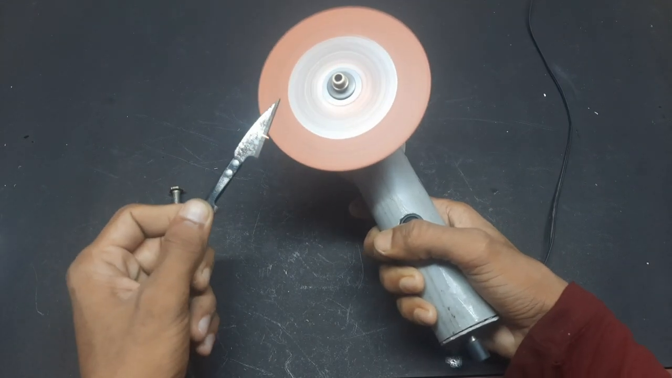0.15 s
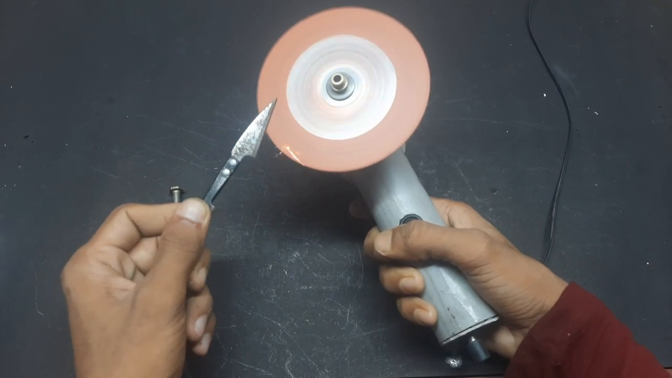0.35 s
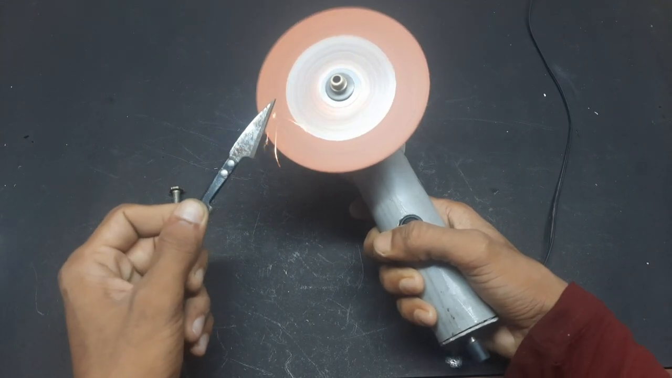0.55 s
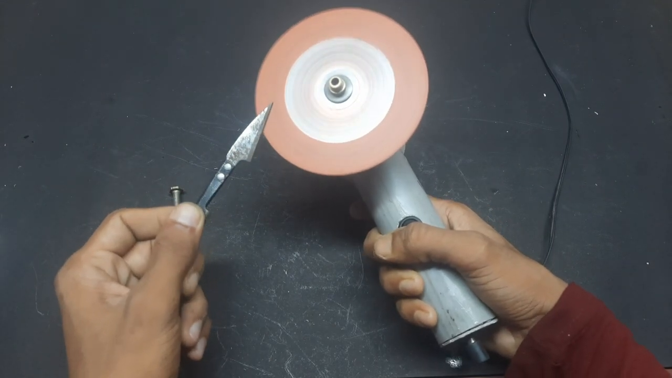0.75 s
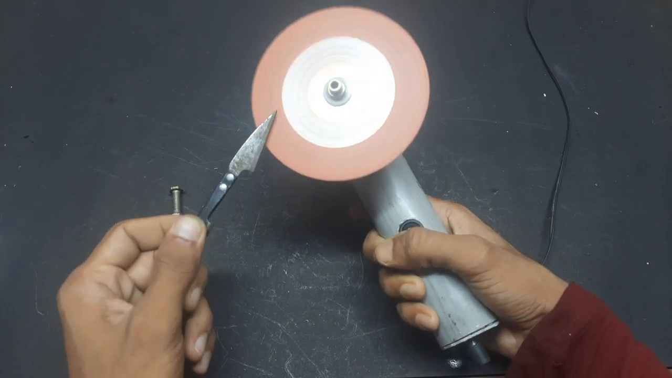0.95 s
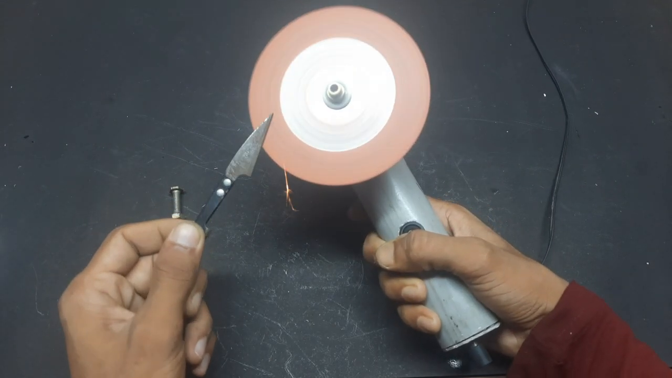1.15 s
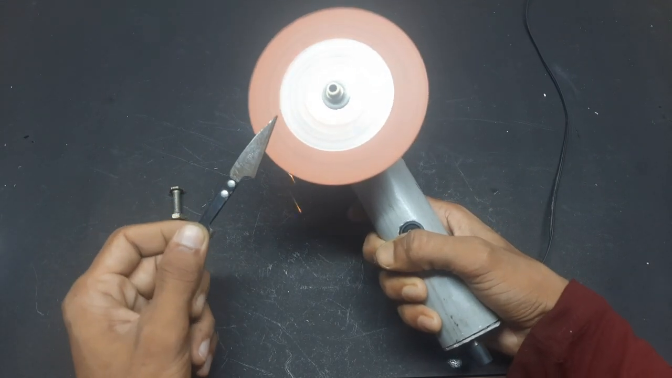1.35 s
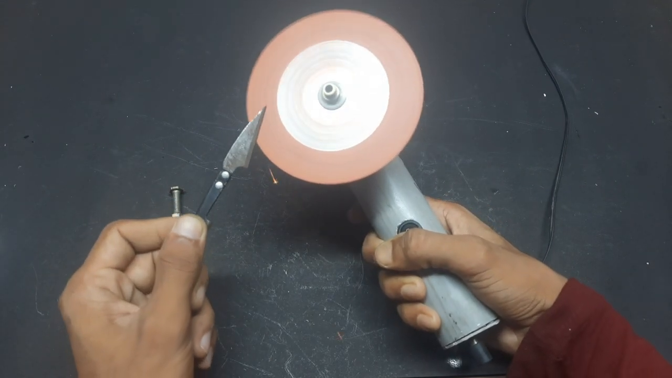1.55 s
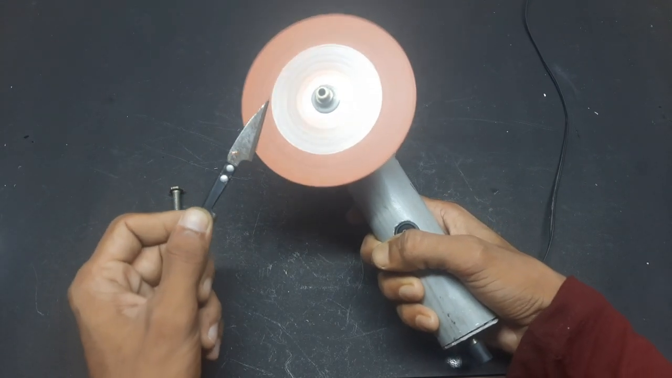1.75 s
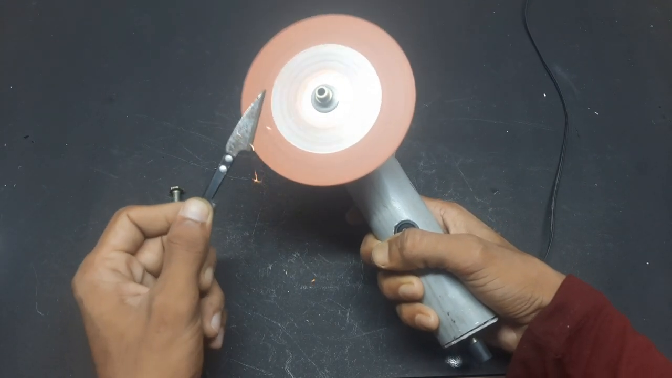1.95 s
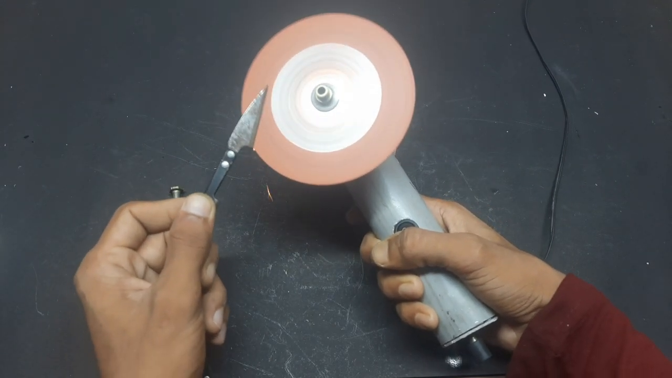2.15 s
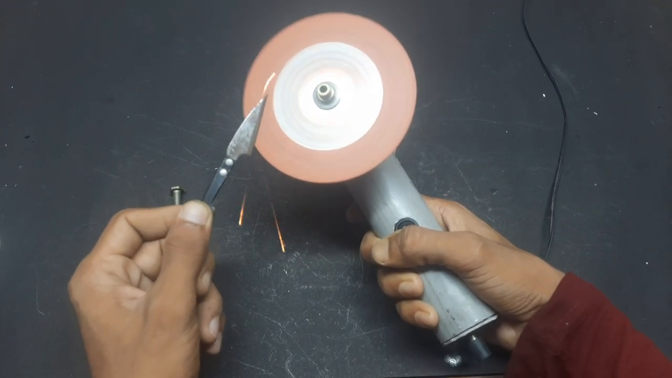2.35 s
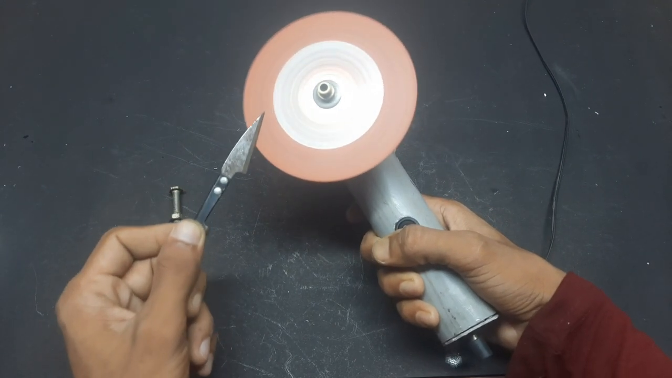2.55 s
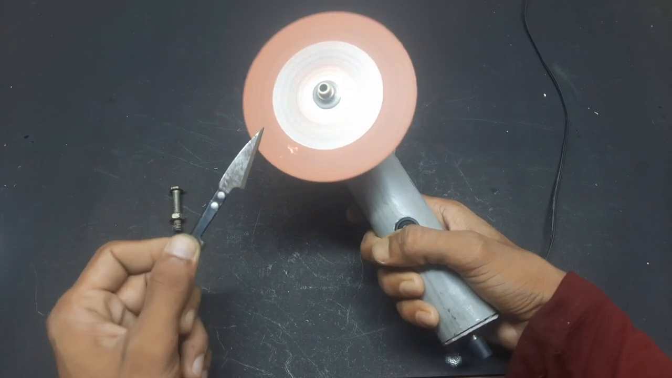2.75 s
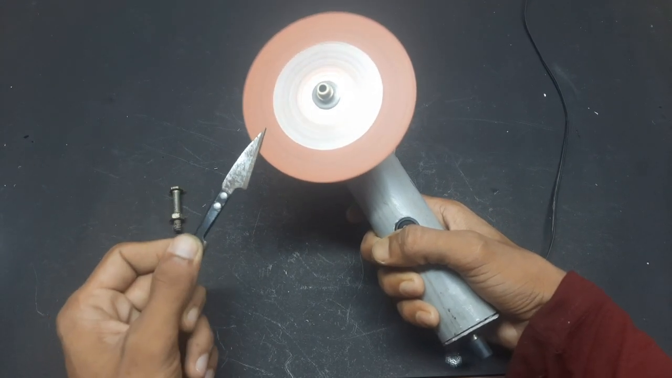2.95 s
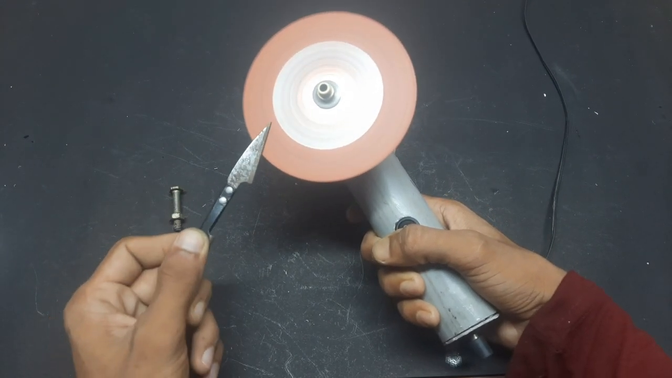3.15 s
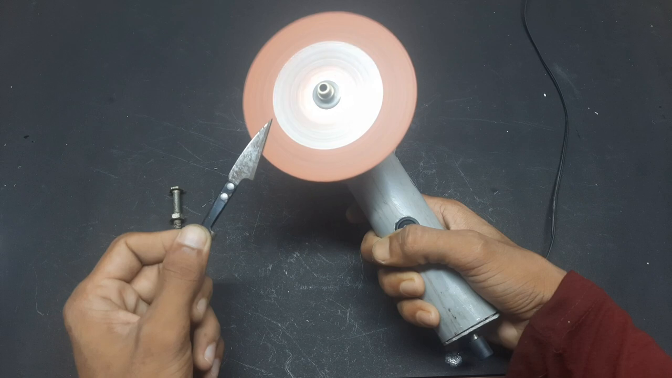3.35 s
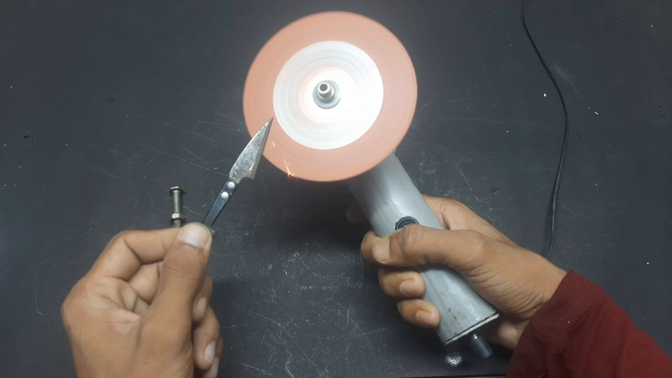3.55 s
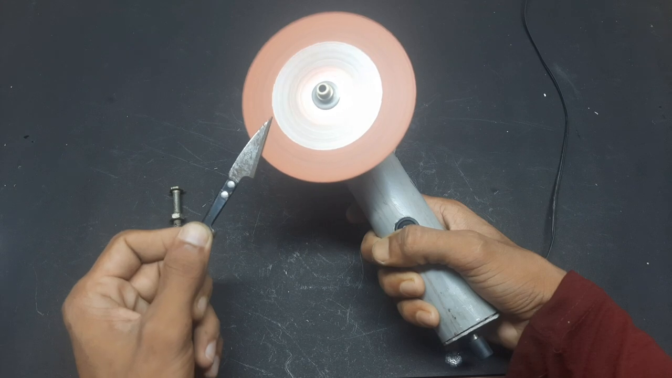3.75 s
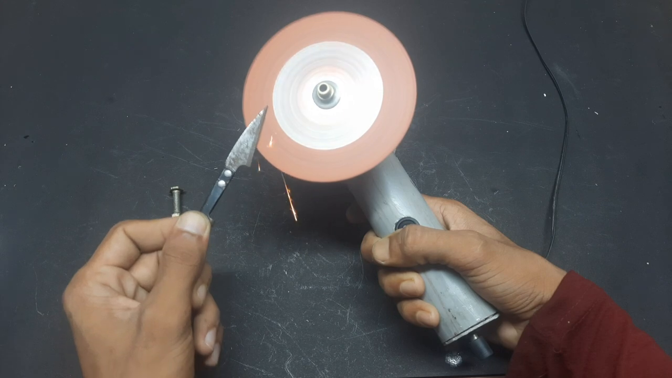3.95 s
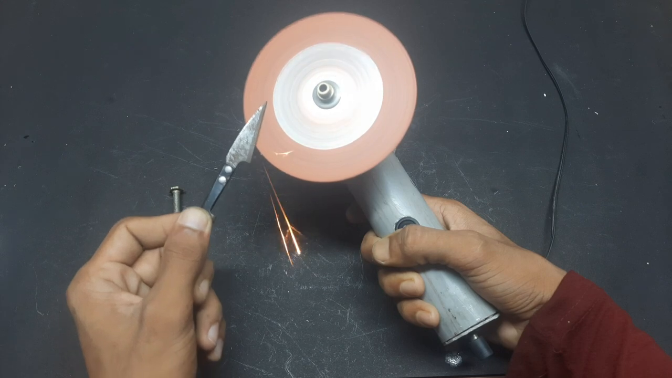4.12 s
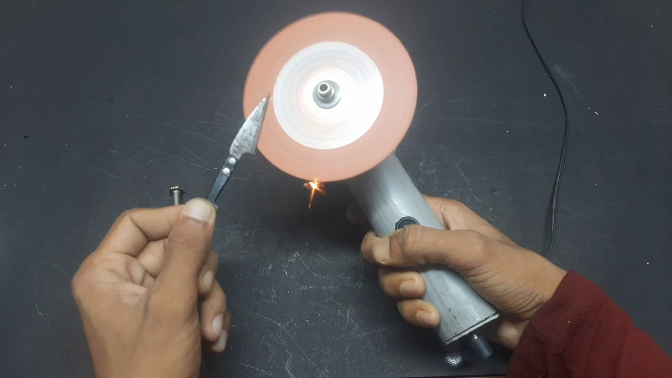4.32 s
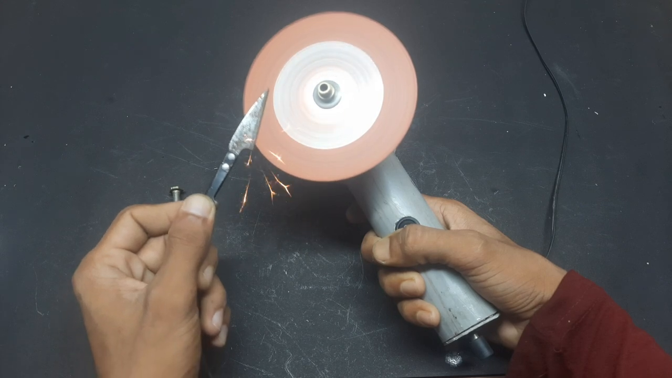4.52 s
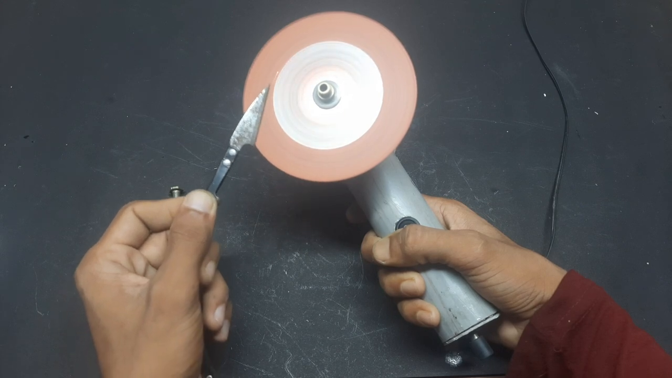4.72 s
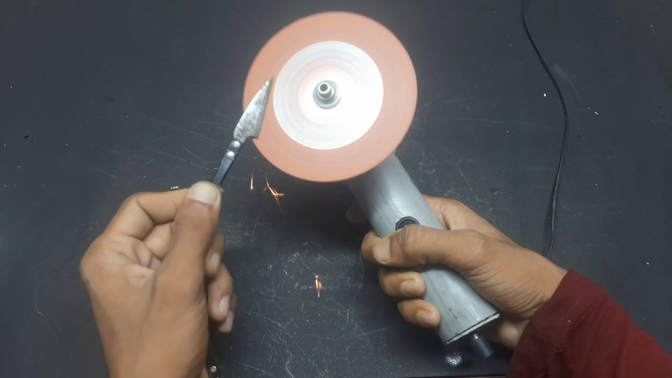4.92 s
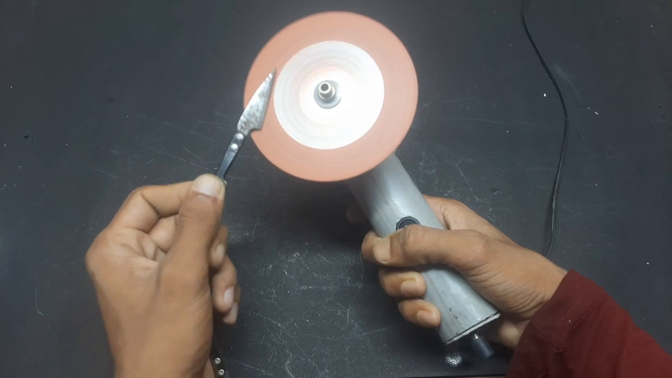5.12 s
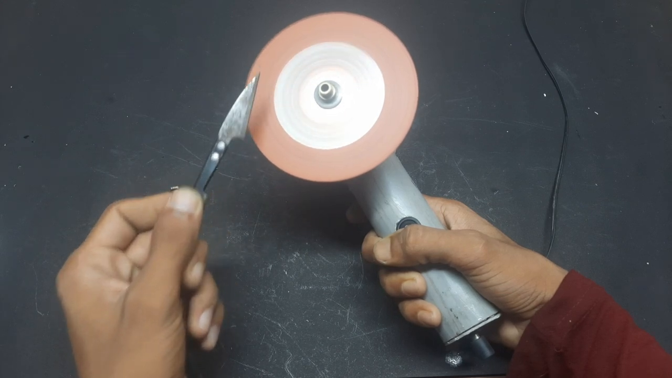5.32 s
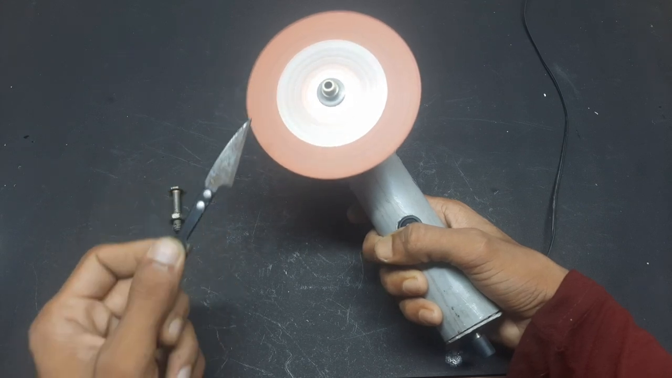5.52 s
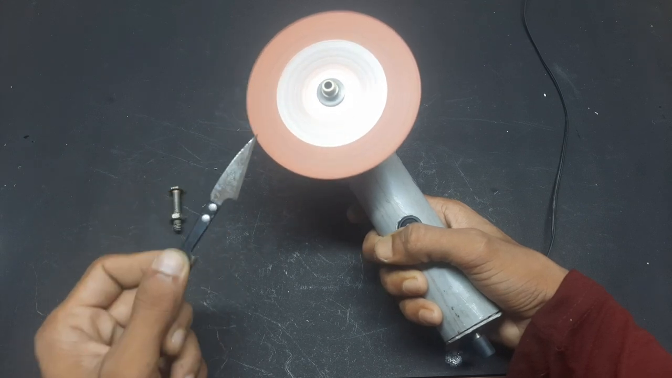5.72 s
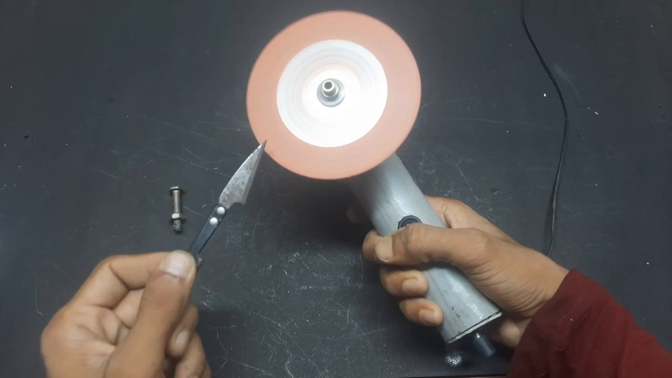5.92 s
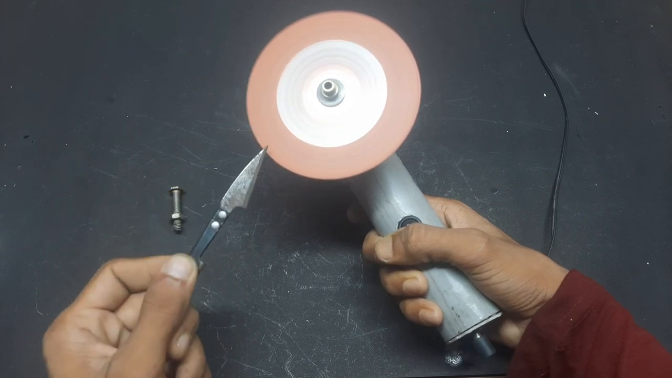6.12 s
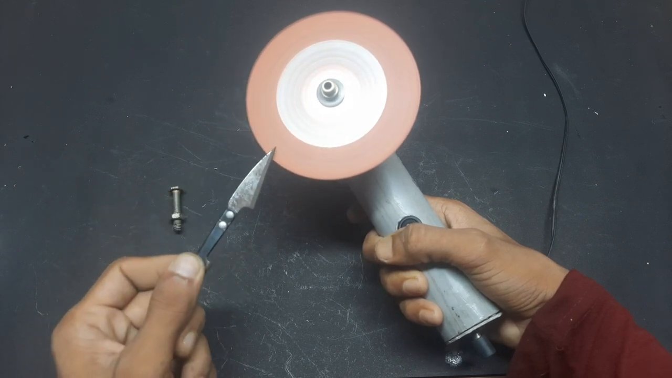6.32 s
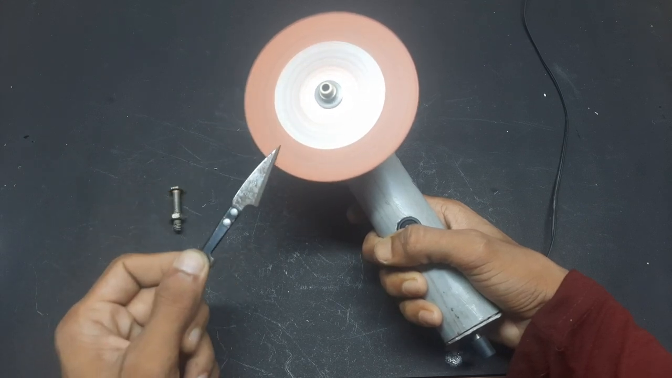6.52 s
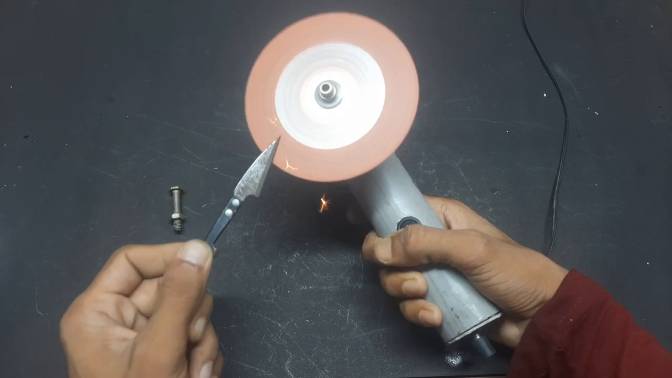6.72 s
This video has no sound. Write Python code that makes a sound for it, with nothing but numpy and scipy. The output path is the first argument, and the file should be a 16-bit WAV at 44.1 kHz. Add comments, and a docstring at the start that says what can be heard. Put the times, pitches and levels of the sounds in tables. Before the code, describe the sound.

In a small workshop, a steel blade is already grinding on a motor-driven abrasive disc: a loud, bright hiss with shrill edge ringing, pulsing quickly with each turn. It lifts after about a second, taps back into a long uneven stroke, leaves with a short squeak, and the motor rattles and hums alone before a last brief grind. Close microphone, sound only on the right.

```python
"""A small steel blade is sharpened on an abrasive disc spun by a home-made motor tool in a small workshop.
From the start grit cuts the steel with a bright hiss and sets its edge and bending modes ringing; the
wobbling disc throbs once a turn and slows under load, over the motor's rattle, whirr, whine and hum.
The blade is lifted and the motor runs on alone; a run of taps by the disc's high spot leads the blade back
into a long stroke. That ends in a rising squeak; after a second pause, taps lead into a last short stroke."""
import sys
import numpy as np
from scipy import signal
from scipy.fft import rfft, irfft
from scipy.io import wavfile
from scipy.ndimage import uniform_filter1d

SR = 44100
rng = np.random.default_rng(int(sys.argv[2]) if len(sys.argv) > 2 else 0)


def wrap_up_sound(samples):
    """Save the sound to the file named by the first command line argument, as 16-bit audio."""
    columns = np.atleast_2d(samples).T
    # keep every value between -1 and 1, then stretch to whole-number steps
    tamed = np.clip(columns, -1, 1)
    steps = np.round(tamed * 32767).astype(np.int16)
    wavfile.write(sys.argv[1], SR, steps)


N = 302967
TIME = np.arange(N) / SR  # s
FREE_TURNS_PER_S = 45.4  # the disc without load

# how hard the blade is pressed on the disc, one curve per stroke: time_s, force_db (force() sets its zero)
STROKES = [
    [(0.0, -32.5), (0.21, -29.5), (0.33, -32.5), (0.4, -30), (0.82, -32), (0.92, -36)],
    [(1.17, -35.5), (1.47, -31.5), (1.98, -30), (2.27, -33.5), (2.5, -29.5), (2.67, -32.5), (2.83, -39),
     (3.02, -38.0), (3.27, -29.5), (4.34, -30), (4.79, -31.5), (5.08, -29.5), (5.17, -33.5), (5.3, -33)],
    [(6.49, -40.5), (6.54, -39), (6.7, -34), (6.87, -26)],
]
# angle of the blade, one row per stroke: extra_edge_bite_db, upper_edge_db, ring_db, throb_db, bedding_s
STROKE_ANGLES = [(0, -0.5, -2.5, 3, .05), (0, -0.5, -0.5, 2.5, 0.073), (6, 2.5, -4, -10.5, 0.038)]


def from_db(db):
    """Decibels to amplitude gain: 20 dB is a factor of ten."""
    return 10 ** (np.asarray(db) / 20)


def rms_one(x):
    """Normalisation: scale to a root mean square of 1."""
    return x / np.sqrt(np.mean(x ** 2) + 1e-20)


def in_time(rows):
    """Linear interpolation: each column of a curve, sample by sample."""
    s, *columns = np.transpose(rows)
    return [np.interp(TIME, s, column) for column in columns]


def body(x, spectrum, modes=(), size=4096):
    """Minimum-phase filtering: a causal filter of unit power, a broad spectrum with resonances on it."""
    hz = np.maximum(np.fft.rfftfreq(size, 1 / SR), 1)
    points = np.array(spectrum)
    db = np.interp(np.log(hz), np.log(points[:, 0]), points[:, 1])
    for centre, width, height in modes:
        db = db + height / (1 + (2 * (hz - centre) / width) ** 2)
    # folding the cepstrum onto positive times makes the response causal
    cepstrum = irfft(np.log(from_db(db)))
    cepstrum[1:size // 2] *= 2
    cepstrum[size // 2 + 1:] = 0
    response = irfft(np.exp(rfft(cepstrum)))
    return signal.fftconvolve(x, response / np.linalg.norm(response))[:N]


def moving_resonance(x, centre_hz, width_hz):
    """Heterodyne filtering: shift a moving centre to 0 Hz, low-pass, shift back; unit power for white noise."""
    carrier = np.exp(2j * np.pi * np.cumsum(centre_hz) / SR)
    sos = signal.butter(N=4, Wn=width_hz / 2, fs=SR, output="sos")
    band = signal.sosfilt(sos, x / carrier)
    return np.real(band * carrier) * np.sqrt(2 * SR / width_hz)


def surface(turns, memory, count):
    """Cyclic correlation: roughness at count places round the rim, each turn partly repeating the last."""
    track = rng.standard_normal((400, count))
    for k in range(1, len(track)):
        track[k] = memory * track[k - 1] + np.sqrt(1 - memory ** 2) * track[k]
    return rms_one(np.interp(turns * count, np.arange(track.size), track.ravel()))


def high_spot(turns, width):
    """Periodic run-out: one smooth bump a turn, of height 1; width is a share of the turn."""
    return np.exp(-(np.sin(np.pi * turns) / (np.pi * width)) ** 2)


def touching(fade_s):
    """Contact gating: 1 while the blade lies on the disc, 0 while it is lifted."""
    contact = np.zeros(N)
    for rows in STROKES:
        inside_s = np.minimum(TIME - rows[0][0], rows[-1][0] - TIME)
        contact += np.clip(1 + inside_s / fade_s, 0, 1)
    return contact


def force():
    """Normal force on the blade in dB against a firm grip, easing just before the blade is lifted."""
    firm_db, release_s, release_db = -28, 0.0419, -2.5
    easing = np.zeros(N)
    for rows in STROKES:
        end = rows[-1][0]
        easing += (TIME < end + .02) * np.exp(-np.maximum(end - TIME, 0) / release_s)
    return in_time(np.vstack(STROKES))[0] - firm_db + release_db * easing


def disc_speed(force_db):
    """Rotational inertia: turns per second, the free speed less a sag that follows the load with a lag."""
    sag_turns_per_s, sag_growth, lag_s = 6.5, .25, .16  # sag under firm force, dB of sag per dB of force
    sag = sag_turns_per_s * touching(fade_s=.03) * from_db(sag_growth * force_db)
    keep = np.exp(-1 / (lag_s * SR))
    lagged = signal.lfilter([1 - keep], [1, -keep], sag, zi=[keep * sag_turns_per_s])[0]
    return FREE_TURNS_PER_S - lagged


def pressure(turns, lumps, wobble_db, lumps_db, width):
    """Amplitude modulation of contact force by the disc's wobble and the lumps of its coating; local rms 1."""
    modulated = from_db(wobble_db * high_spot(turns, width) + lumps_db * lumps)
    return modulated / np.sqrt(uniform_filter1d(modulated ** 2, size=SR // 5))


def waver():
    """Slow random fluctuation of an unsteady hand; rms 1."""
    changes_per_s = 4.7
    return rms_one(np.interp(TIME * changes_per_s, np.arange(200), rng.standard_normal(200)))


def hand_waver_db():
    """Random level modulation by the hand, 2 dB rms."""
    return 2 * waver()


def bedding():
    """Exponential settling: dB by which the edge modes are held back early in each stroke."""
    start_db = -10
    held_db = np.zeros(N)
    for rows, angle in zip(STROKES, STROKE_ANGLES):
        start = rows[0][0]
        held_db += start_db * (TIME > start - .02) * np.exp(-np.maximum(TIME - start, 0) / angle[-1])
    return held_db


def driven(firm_db, growth, force_db):
    """Power law of excitation: gain firm_db at firm force, growing by growth dB per dB of force."""
    return from_db(firm_db + growth * force_db)


def grit(spread_db):
    """Random impact noise: countless grains cut the steel, each with a strength of its own."""
    return rms_one(rng.standard_normal(N) * from_db(spread_db * rng.standard_normal(N)))


def cutting_hiss(cut, edge_db, scrapes):
    """Broadband excitation: grains shearing steel give noise with a fixed spectrum."""
    # frequency_hz, relative_level_db
    hiss_spectrum = [(5500, -32), (6400, -14), (7300, -18), (8150, -14), (8400, -8.5), (9800, -1.5),
                     (11200, 3), (12000, 2), (12700, -1.5), (14000, 5.5), (15000, -5), (16000, 1)]
    drive = cut * driven(-24, 0.47, edge_db) * from_db(0.15 * bedding() + hand_waver_db())
    return body(grit(spread_db=3.0) * (drive + scrapes * from_db(-4.0)), hiss_spectrum)


def edge_squeal(cut, bite, edge_db, upper_db, scrapes):
    """Resonance of the thin edge: noise drives two shrill modes, the upper wandering with the contact point."""
    lower_hz, upper_hz, upper_wander_hz = 13300, 15300, 270  # the wander is an rms
    lower = cut * driven(-26, 0.75, edge_db) * from_db(0.44 * bedding() + hand_waver_db())
    upper = bite * driven(-23.5, 0.28, edge_db) * from_db(upper_db + bedding() + hand_waver_db())
    lower_noise = grit(spread_db=4.2) * (lower + scrapes * from_db(-28))
    upper_noise = grit(spread_db=5) * upper
    squeal = moving_resonance(lower_noise, np.full(N, lower_hz), width_hz=810)
    return squeal + moving_resonance(upper_noise, upper_hz + upper_wander_hz * waver(), width_hz=1220)


def rasping(rub, force_db, turns, scrapes):
    """Roughness excitation: the rim's texture passing under the blade gives a rasp of fixed spectrum."""
    # frequency_hz, relative_level_db
    rasp_spectrum = [(1700, -23), (1930, -11), (2170, -2.5), (2600, -5), (2900, -9), (3500, -2), (4000, 0),
                     (4600, 4), (4750, -2.5), (5600, -3), (5750, -7.5), (6200, -8.5), (6500, -33),
                     (9000, -57)]
    drive = rub * driven(-35, 0.68, force_db) + scrapes * from_db(-21.0)
    return body(surface(turns, memory=0.15, count=1100) * drive, rasp_spectrum)


def upper_bend(rub, force_db, turns, scrapes):
    """Flexural resonance: a higher bending mode grows steeply with force and flares as the grit's grip changes."""
    flare_db, mode_hz = 2.8, 4255
    flare = rms_one(from_db(flare_db * surface(turns, memory=0.15, count=2)))
    drive = rub * flare * driven(-34.5, 1.76, force_db) + scrapes * from_db(-32)
    return moving_resonance(grit(spread_db=3.0) * drive, np.full(N, mode_hz), width_hz=237)


def bending_ring(bend, force_db, ring_db, turns):
    """Contact stiffness: the main bending note rises with force and dips once a turn, after the high spot."""
    firm_hz, hz_per_db, swing_hz, lag_turns = 1570, 5, 84, 0.11
    flex = bend * driven(-33, 1.42, force_db) * from_db(ring_db)
    swing = np.cos(2 * np.pi * (turns - lag_turns))
    ring_hz = firm_hz + hz_per_db * force_db - swing_hz * swing
    return moving_resonance(surface(turns, memory=0.61, count=1100) * flex, ring_hz, width_hz=330)


def disc_rumble(rub, contact, force_db):
    """Forced vibration: low rumble of the disc, fine noise with frequent random low bumps."""
    # frequency_hz, relative_level_db
    rumble_spectrum = [(15, -41), (25, -38), (86, -2.5), (150, -12.5), (207, 2.5), (272, -6), (295, -9),
                       (375, -6), (476, -3), (508, -4.5), (606, -7), (821, -18), (1150, 4), (1500, -17),
                       (2530, -120)]
    bumps_per_s, bump_db = 14, -8  # mean rate; level against the fine noise
    bumps = rms_one(rng.choice([-1, 1], N) * (rng.random(N) < bumps_per_s / SR))
    drive = grit(spread_db=2.0) * rub + from_db(bump_db) * bumps * contact
    return body(drive * driven(-55, -0.15, force_db), rumble_spectrum)


def grinding(force_db, turns):
    """Modal excitation: grit under a throbbing force drives the thin edge, the bending modes and the disc."""
    throb_firm_db, throb_per_db = 7, 1.7  # the once-a-turn throb deepens with force
    edge_limit_db = -3  # above this force the hiss and the edge modes grow no more
    rows_in_time = []
    for rows, angle in zip(STROKES, STROKE_ANGLES):
        rows_in_time += [(rows[0][0], *angle), (rows[-1][0], *angle)]
    bite_db, upper_db, ring_db, extra_throb_db, _ = in_time(rows_in_time)
    throb_db = throb_firm_db + extra_throb_db + throb_per_db * force_db
    edge_db = np.minimum(force_db + bite_db, edge_limit_db)
    contact = touching(fade_s=0.0067)
    scrapes, free_ring = taps()
    lumps = surface(turns, memory=0.64, count=12)
    # each part of the blade feels the wobble and the lumps to its own degree
    cut = contact * pressure(turns, lumps, wobble_db=0.35 * throb_db, lumps_db=1.0, width=0.18)
    bite = contact * pressure(turns, lumps, wobble_db=1.7 * throb_db, lumps_db=1.1, width=.26)
    rub = contact * pressure(turns, lumps, wobble_db=1.0, lumps_db=1.88, width=0.22)
    bend = contact * pressure(turns, lumps, wobble_db=6, lumps_db=-1.3, width=0.3)
    bright = cutting_hiss(cut, edge_db, scrapes) + edge_squeal(cut, bite, edge_db, upper_db, scrapes)
    middle = rasping(rub, force_db, turns, scrapes) + upper_bend(rub, force_db, turns, scrapes)
    ring = bending_ring(bend, force_db, ring_db, turns) + free_ring
    return bright + middle + ring + disc_rumble(rub, contact, force_db)


def bearing_rattle(speed, turns):
    """Impact excitation: the shaft knocks in its bearings once a turn and the housing resonates."""
    # frequency_hz, relative_level_db
    rattle_spectrum = [(800, -31), (1120, 0.5), (1500, -9.5), (1900, -3), (2150, -11.5), (2700, -10.5),
                       (3300, -6.5), (3900, -16.5), (5400, -17.5), (6200, -32), (8000, -33), (9300, -19),
                       (12800, -17.5), (15500, -26.5)]
    # resonances of the housing: centre_hz, width_hz, height_db
    housing_modes = [(1420, 310, 13.5), (2660, 100, 13), (4260, 42, 15.5)]
    knock = rms_one(from_db(13 * high_spot(turns, width=.23)))
    bearing = rms_one(surface(turns, memory=0.99, count=1000) + 0.61 * rng.standard_normal(N))
    rattle = from_db(-54.0) * body(bearing * knock, rattle_spectrum, housing_modes)
    pitch_swing = 0.023  # share by which the pitch slides within a turn
    shift_s = pitch_swing * np.cos(2 * np.pi * turns) / (2 * np.pi * speed)
    return np.interp(TIME + shift_s, TIME, rattle)


def rotor_whirr(turns):
    """Rotational noise: roughness that partly repeats each turn, coloured by a fixed spectrum."""
    # frequency_hz, relative_level_db
    motor_spectrum = [(29, -104), (50, -45), (92, -18), (177, -17.5), (231, -6.5), (268, -8), (296, -7.5),
                      (376, -10), (460, -5), (521, -8.5), (1000, -17), (1300, -23), (2200, -120)]
    return from_db(-58.5) * body(surface(turns, memory=0.22, count=1000), motor_spectrum)


def rotor_whine(speed, turns):
    """Resonance crossing: a whine locked to the rotation swells as it crosses a resonance of the housing."""
    order, peak_hz, width_hz, peak_db = 35, 1530, 42, -54  # order in cycles per turn
    swell = 1 / np.hypot(1, 2 * (order * speed - peak_hz) / width_hz)
    return from_db(peak_db) * swell * np.sqrt(2) * np.sin(2 * np.pi * order * turns)


def motor(speed, turns):
    """Superposition of the bearing rattle with the whirr and whine of the rotor."""
    return bearing_rattle(speed, turns) + rotor_whirr(turns) + rotor_whine(speed, turns)


def hum():
    """Supply ripple: the rectified supply makes the motor hum at fixed pitches."""
    # pitch_hz, level_db (rms, ahead of the microphone gain)
    ripple = [(100, -83.5), (300.2, -62.5)]
    return sum(from_db(db) * np.sqrt(2) * np.sin(2 * np.pi * hz * TIME) for hz, db in ripple)


def workshop(x, count=5):
    """Diffuse reverberation: dense decaying reflections whose pattern shifts as hands and tool move."""
    t60_s, room_db = 0.31, -6
    age = TIME[:SR // 2]
    decay = from_db(-60 * age / t60_s) * np.minimum(age / 0.00057, 1)
    tails = rng.standard_normal((count, len(age))) * decay
    moments = np.linspace(0, TIME[-1], 80)
    shares = np.array([np.interp(TIME, moments, rng.standard_normal(len(moments))) for _ in tails])
    shares /= np.linalg.norm(shares, axis=0)
    wet = np.zeros(N)
    for share, tail in zip(shares, tails):
        wet += signal.fftconvolve(x * share, tail / np.linalg.norm(tail))[:N]
    return x + from_db(room_db) * wet


def input_noise():
    """Electrical noise: faint random noise with a fixed spectrum."""
    # frequency_hz, relative_level_db
    input_spectrum = [(20, -16), (60, 7), (110, 0), (170, -6), (235, -1), (400, -8.5), (900, -13.5),
                      (2000, -17), (3500, -23.5), (7000, -29), (15500, -30)]
    return from_db(-77) * body(rng.standard_normal(N), input_spectrum)


def taps():
    """Free vibration: in light contact the high spot taps once a turn, a brief scrape and a decaying ring."""
    # runs of taps: first_s, last_s, mid_run_db
    tap_runs = [(0.9371, .9377, -13), (1.1035, 1.1870, -11.5), (6.4232, 6.5098, -12.5)]
    tap_s, taper_db, ring_db = 0.0036, 1.65, -15.5  # a scrape peaks at half of tap_s
    ring_hz, ring_t60_s = 1433, 0.032
    scrapes, rings = np.zeros(N), np.zeros(N)
    age = TIME[:SR // 5]
    phase = age / (tap_s / 2)
    scrape = phase ** 2 * np.exp(1 - phase ** 2)
    decay = from_db(ring_db - 60 * age / ring_t60_s)
    ring = decay * np.minimum(phase, 1) * np.sin(2 * np.pi * ring_hz * age)
    for first, last, top_db in tap_runs:
        count = 1 + round(abs(last - first) * FREE_TURNS_PER_S)
        for k, s in enumerate(np.linspace(first, last, count)):
            span = slice(int(s * SR), int(s * SR) + len(age))
            # a run swells and dies away
            gain = from_db(top_db - taper_db * (k - (count - 1) / 2) ** 2)
            scrapes[span] += gain * scrape
            rings[span] += gain * ring
    return scrapes, rings


def squeak():
    """Frequency glide: the higher bending mode slides up as the blade comes free of the disc."""
    start_s, length_s, start_hz, end_hz, peak_db = 5.277, .04, 4150, 4700, -35
    progress = np.clip((TIME - start_s) / length_s, 0, 1)
    pitch_hz = start_hz + (end_hz - start_hz) * progress
    return from_db(peak_db) * np.sin(np.pi * progress) * np.sin(2 * np.pi * np.cumsum(pitch_hz) / SR)


def scene():
    """Load coupling: force sets the disc's speed; all sound is on the right, only input noise on the left."""
    microphone_db = 6
    force_db = force()
    speed = disc_speed(force_db)
    turns = np.cumsum(speed) / SR
    sources = grinding(force_db, turns) + squeak() + motor(speed, turns)
    sound = workshop(sources) + hum()
    return np.array([input_noise(), from_db(microphone_db) * sound])


def record(dry):
    """Saturation and band limiting: the highest peaks are rounded and the top is cut steeply."""
    overload, cutoff_hz = .85, 15770  # overload as a share of full scale
    rounded = dry / (1 + (dry / overload) ** 8) ** (1 / 8)
    lowpass = signal.firwin(601, cutoff_hz, fs=SR, window=("kaiser", 7))
    return signal.fftconvolve(rounded, lowpass[None], mode="same", axes=1)


dry = scene()
out = record(dry)
wrap_up_sound(out)
```